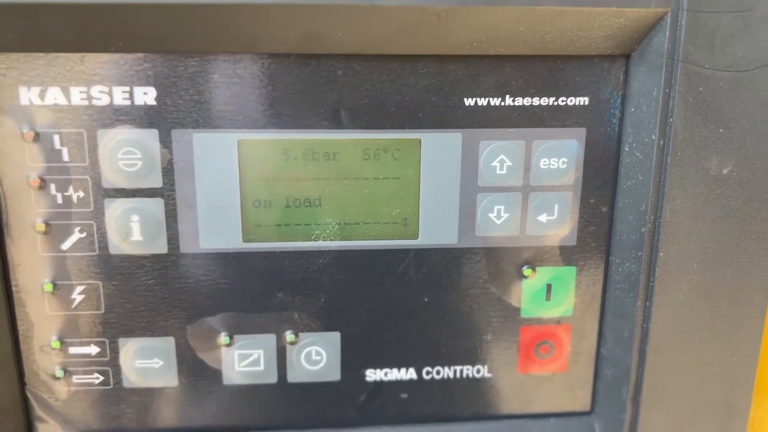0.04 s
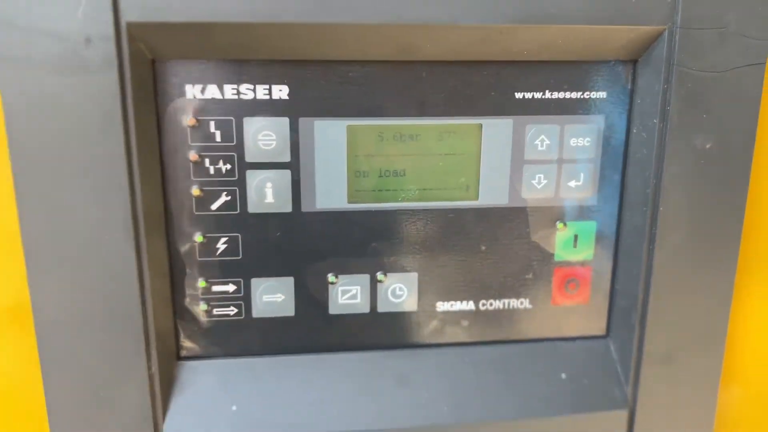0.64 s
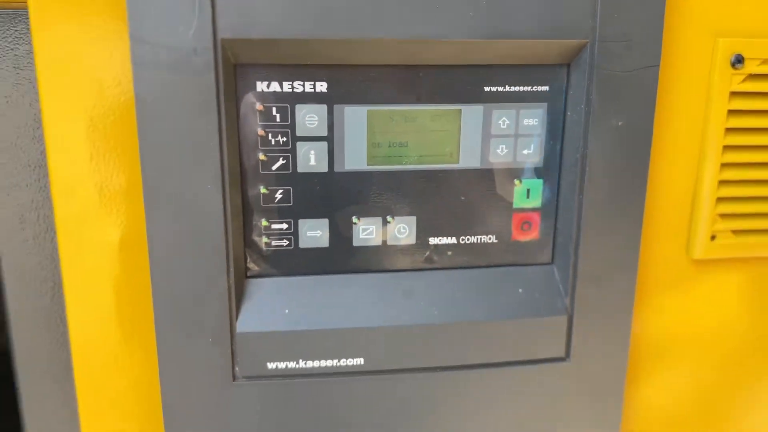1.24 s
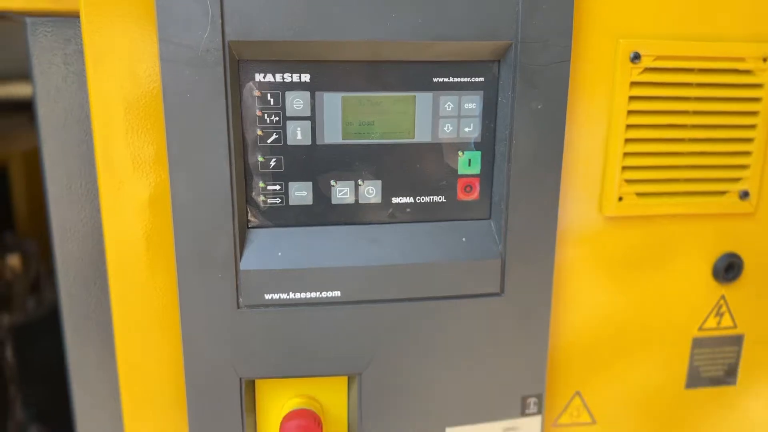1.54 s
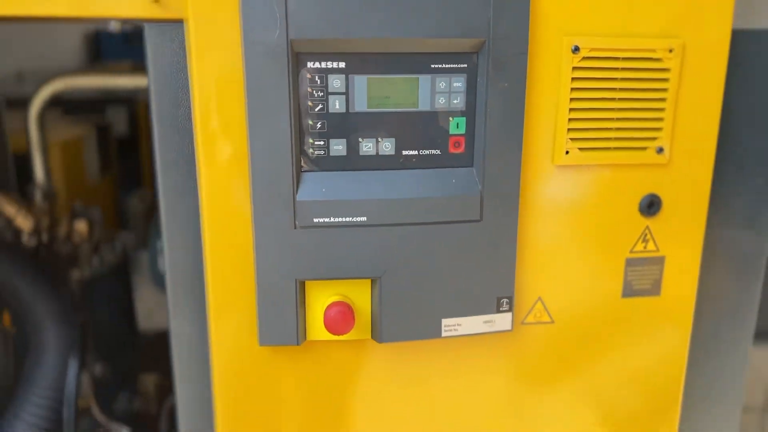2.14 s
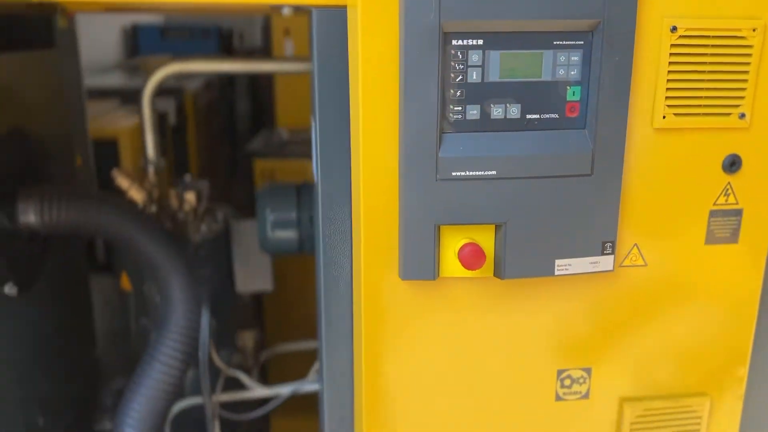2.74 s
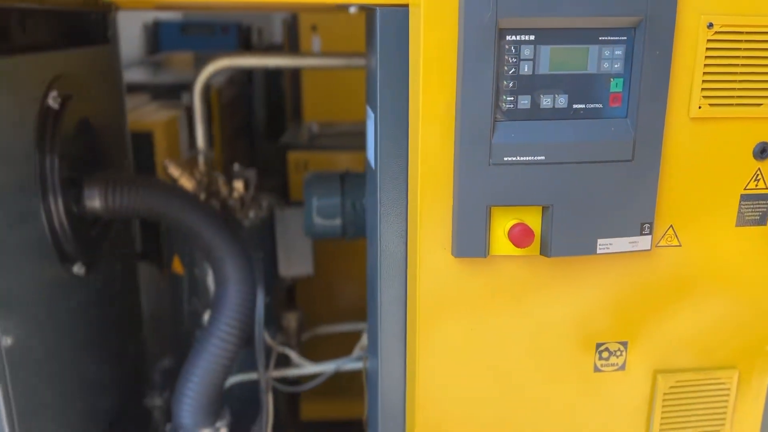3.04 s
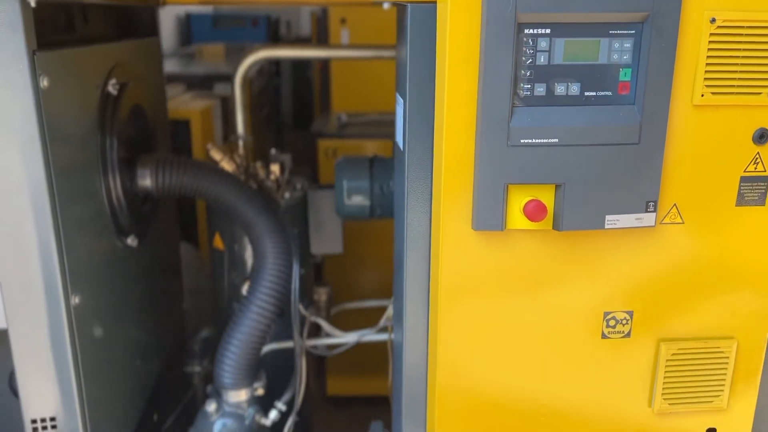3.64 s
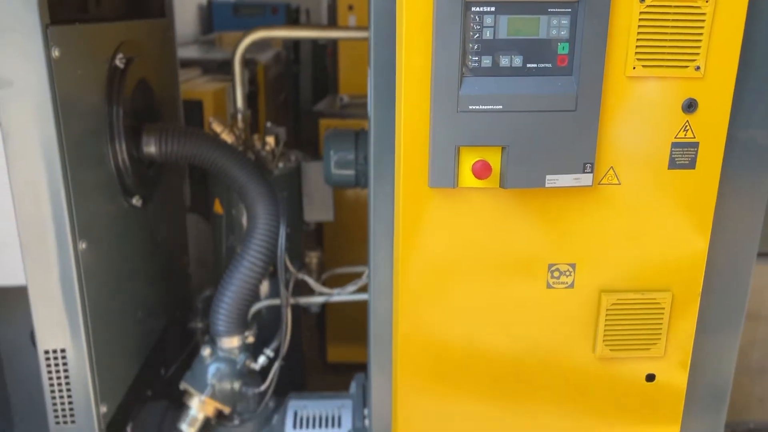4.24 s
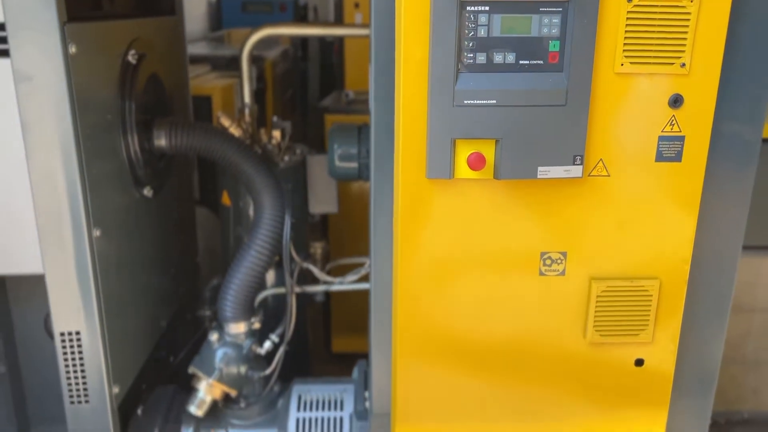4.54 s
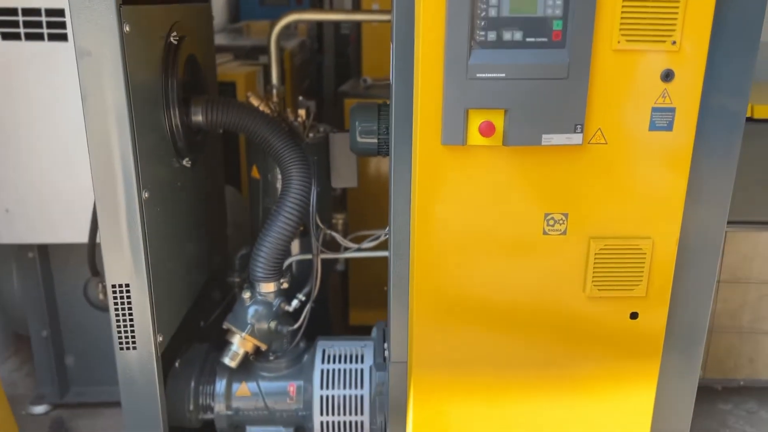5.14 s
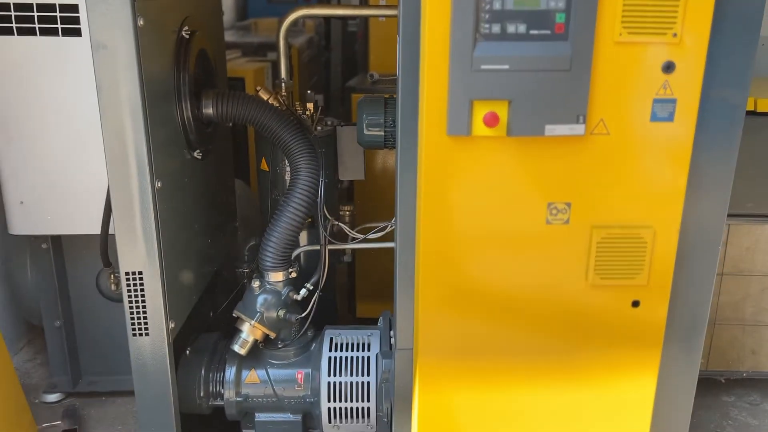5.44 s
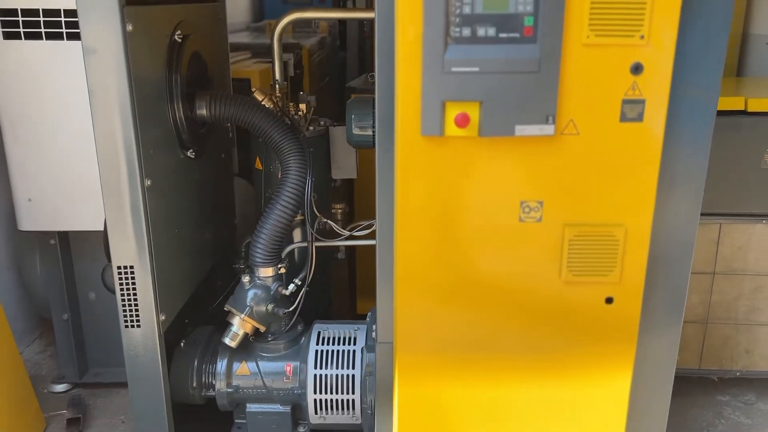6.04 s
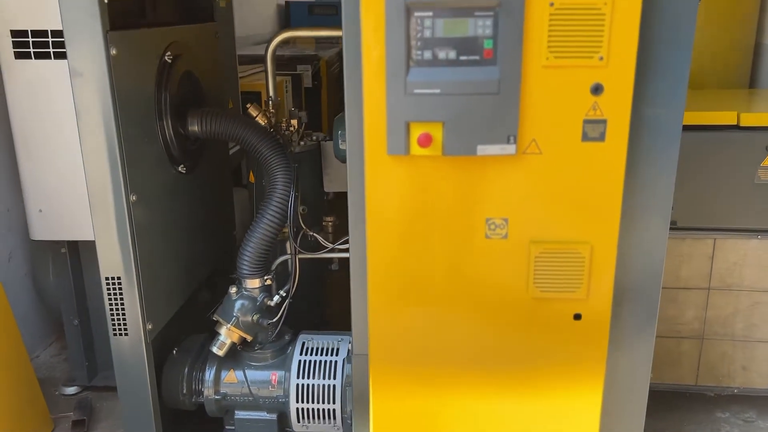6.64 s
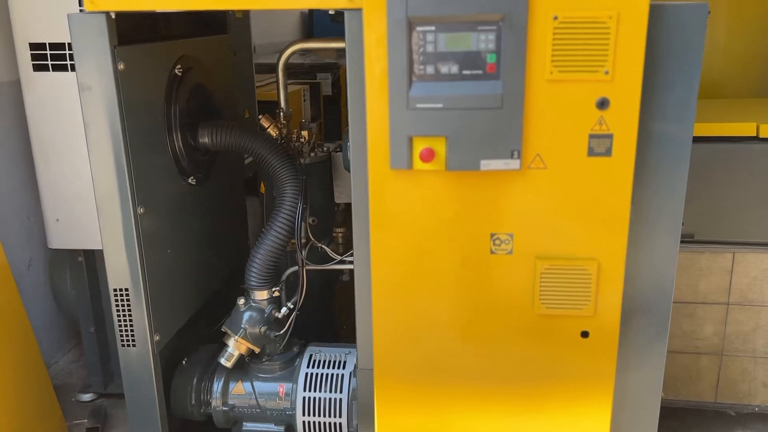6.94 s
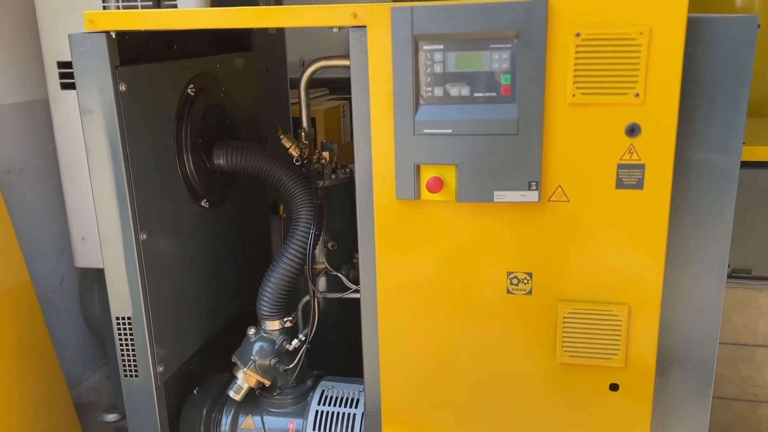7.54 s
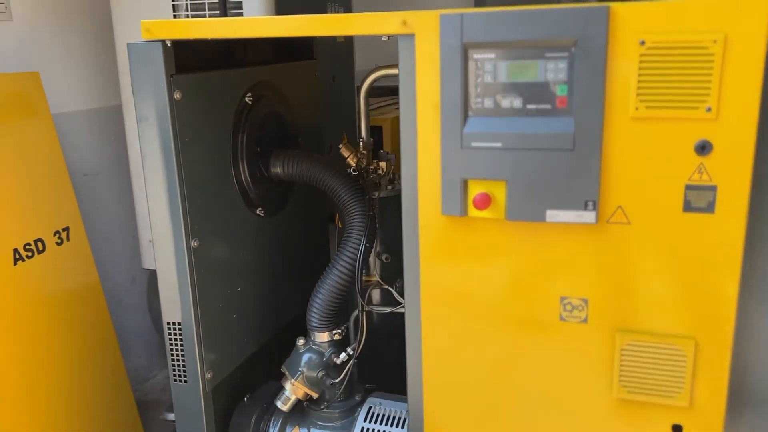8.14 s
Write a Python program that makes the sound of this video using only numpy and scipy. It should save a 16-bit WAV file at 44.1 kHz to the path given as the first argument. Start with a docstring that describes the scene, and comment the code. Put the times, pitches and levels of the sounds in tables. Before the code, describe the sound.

An air compressor runs in a workshop, with a loud, bright, steady hiss of air rushing through its pipes. Beneath it sit a quieter wavering hum and the low roar of a cooling fan. The hiss eases slightly as the microphone backs away. In the second half the cooling draught hits the microphone in soft thumps and short puffs, and the hiss grows a little as it comes closer again.

```python
"""Screw air compressor on load

In a workshop, air rushing through the pipework hisses; the rotors hum and the cooling fan roars low
in a cabinet with its side panel off. The microphone backs away, then comes closer again. Later it
stands in the cooling draught, whose eddies press on its two ports in soft thumps and short puffs."""
import sys
import numpy as np
from scipy import signal
from scipy.fft import rfft, irfft
from scipy.io import wavfile

SR = 44100
rng = np.random.default_rng(int(sys.argv[2]) if len(sys.argv) > 2 else 0)


def generate_wav(sig):
    """Save sig (samples, or channels by samples) to the path in sys.argv[1] as 16-bit PCM at SR."""
    pcm = np.round(np.clip(np.atleast_2d(sig).T, -1, 1) * 32767).astype(np.int16)
    wavfile.write(sys.argv[1], SR, pcm)


N = 369999
HOP = 256  # samples between spectral frames
TIME = np.arange(N) / SR
FRAME_S = (np.arange(N // HOP + 5) * HOP / SR)[:, None]
BIN_HZ = np.fft.rfftfreq(8 * HOP, 1 / SR)

# path of the microphone: t/s, distance from the machine/m
MIC_PATH = [(0, 0.51), (1.1, 0.39), (2, 0.67), (5.1, 1.5), (6.7, 1.56), (8.39, .72)]
# level difference between the microphone's ports: f/Hz, left minus right/dB
PORT_BALANCE = [(300, .5), (1200, 0), (2000, -1.2), (2800, .8), (4500, 5), (5500, 8.7), (6300, 4.8),
                (7200, 1.2), (8200, 1.3), (9000, 0)]
# left/right likeness of the hiss and roar: f/Hz, likeness (0-1)
STEREO_LIKENESS = [(100, .92), (250, .95), (450, .8), (650, .45), (1200, .35), (3300, .25), (5700, .15),
                   (6900, .48), (7700, .62), (8900, .78), (9600, .999), (10850, .999), (11600, .7),
                   (12600, .99), (14100, .99), (15200, .6)]
# left/right phase; a band near 10 kHz sounds wide, in opposite phase: f/Hz, lead of the left/rad
STEREO_PHASE = [(200, .2), (700, .5), (1500, 0), (7600, 0), (8450, -1.6), (9550, -3.12), (10800, -3.16),
                (11200, -4.1), (12200, -5.1), (12600, -6.2), (14300, -6.4), (15800, -9.1)]
# rotor hum along the path: t/s, level/dB of harmonics 1, 2 and 3
HUM_LEVELS = [(0, -51.5, -56.5, -75), (0.6, -75, -55, -78), (1.3, -76, -60.5, -73), (1.8, -66, -60, -64),
              (2.2, -58.5, -60, -60.5), (2.7, -54.5, -62, -63), (3.9, -53.5, -67.5, -64),
              (4.55, -53.5, -61.5, -63.5), (5.0, -57, -74, -60), (5.25, -54.5, -76, -68),
              (5.8, -59, -73, -68), (6.6, -60, -73, -59.5), (7.3, -61, -68, -58.5), (8.39, -76, -66, -59)]
# spectrum of the cooling fan: f/Hz, relative level/dB
FAN_SPECTRUM = [(20, -30), (40, -33), (65, -28), (100, -6.5), (125, -12), (175, -5.5), (210, 2.5),
                (280, -2), (330, 0.5), (420, -5.5), (600, -15), (1000, -30), (2000, -50)]
# cooling draught at the microphone: t/s, strength/dB
DRAUGHT_LEVELS = [(0, -26), (2.4, -18), (3.3, -12), (4.5, 1), (4.95, -6), (5.27, 3.5), (5.46, -8), (6.6, 1),
                  (7.2, 3), (7.7, -1), (8.39, -5)]
# spectrum of one thump: f/Hz, relative level/dB
THUMP_SPECTRUM = [(20, -12), (60, 3.5), (130, -4), (240, 2), (330, -3), (500, -6.5), (900, -13),
                  (2000, -58)]
# large eddies striking the microphone: t/s, strength/dB, extra bass/dB, extra edge/dB
LARGE_EDDIES = [(5.446, -12, 9, -2), (5.599, 1.5, 4, 0), (5.618, -7, -1, 0), (5.668, -2, -5, -2),
                (5.736, -2, 3, -1), (5.78, -2, -16, -6), (5.918, -1, -12, -6), (6.107, 0, -24, -11),
                (6.128, -7, -1, -2), (6.206, -2, 0, 3), (6.297, -1, -7, 0), (6.415, 0, -22, -8),
                (6.554, -2, -24, -7), (6.627, 1.5, -28, -12), (6.831, -4, -26, -12), (6.9, -4, -19, -2),
                (6.95, -1, -14, 0), (7.047, -1, -22, -2), (7.079, -5, -16, -1), (7.131, -6, -19, -4),
                (7.153, -2, -22, -1), (7.221, 0.5, -22, -11), (7.24, 0, -18, -2), (7.415, 4, -17, -14),
                (7.552, 2, -26, -8), (7.653, 3, -23, -8), (7.685, -7, -26, 1), (7.712, -2, -20, -1),
                (7.882, 0, -17, -6), (8.063, 1, -18, -8), (8.105, -3, -22, -5), (8.15, -1, -22, -6),
                (8.183, -3, -19, -1), (8.381, 0, -20, -4)]
# spectrum of the rushing air: f/Hz, relative level/dB
HISS_SPECTRUM = [(150, -33.5), (620, -22.5), (800, -17), (1300, -16), (1800, -12.5), (2800, -7.5),
                 (4000, -3.5), (4700, -3), (5700, 0.3), (7400, -5), (8400, -1.1), (10300, -10.5),
                 (11600, -0.5), (12800, -3.5), (15600, -5.5)]
# resonances of the steel cabinet: f/Hz, width/Hz, lift/dB
CABINET_MODES = [(750, 77, 1.5), (1110, 210, 2), (1760, 74, 1.5), (2260, 210, 1.5), (2820, 230, 2),
                 (6050, 110, 0.5), (6530, 200, 1)]
# peaks and dips from the front panel's reflection, close up: f/Hz, width/Hz, left/dB, right/dB
PANEL_REFLECTION = [(945, 310, -4.5, -8.5), (1650, 400, 1.5, 0.5), (2400, 96, 3.5, 0),
                    (4850, 140, 1.5, 1.5), (5770, 300, 0, 2), (8100, 330, -6.5, -4.3)]


def amp(db):
    """Amplitude ratio of a level in decibels."""
    return 10 ** (np.asarray(db) / 20)


def unit_rms(x):
    """Normalisation to rms 1."""
    return x / np.sqrt(np.mean(x ** 2) + 1e-20)


def bell(x, centre, width):
    """Gaussian curve of height 1."""
    return np.exp(-((x - centre) / width) ** 2)


def at_hz(rows, hz=BIN_HZ):
    """Interpolation of a table on a logarithmic frequency axis."""
    points_hz, value = np.transpose(rows)
    return np.interp(np.log(hz + 1), np.log(points_hz), value)


def drift(rate_hz):
    """Low-pass Gaussian noise of rms 1, one value a sample."""
    hz = np.fft.rfftfreq(N, 1 / SR)
    return unit_rms(irfft(rfft(rng.standard_normal(N)) * bell(hz, 0, rate_hz), N))


def patches(lasting_s, width_hz):
    """Random field of rms 1, correlated over neighbouring frames and bins."""
    shape = len(FRAME_S), len(BIN_HZ)
    along = np.fft.fftfreq(shape[0], HOP / SR)[:, None]
    across = np.fft.rfftfreq(shape[1], BIN_HZ[1])
    blur = np.exp(-(along * lasting_s) ** 2 - (across * width_hz) ** 2)
    return unit_rms(np.fft.irfft2(np.fft.rfft2(rng.standard_normal(shape)) * blur, shape))


def distance(s):
    """Metres from source to microphone at time s."""
    return np.interp(s, *np.transpose(MIC_PATH))


def draught_strength():
    """Amplitude envelope of the airflow at the microphone."""
    return amp(np.interp(TIME, *np.transpose(DRAUGHT_LEVELS)))


def stereo_noise(field_db, scatter_rad=0):
    """Partial correlation: coloured noise of rms 1, partly alike left and right; scatter blurs it."""
    a, b, c, d = rng.standard_normal(size=(4, len(FRAME_S), len(BIN_HZ)))
    left, independent = a + 1j * b, c + 1j * d
    likeness = at_hz(STEREO_LIKENESS)
    lead = at_hz(STEREO_PHASE) + scatter_rad * (1 - likeness) ** 2 * patches(2.62, 410)
    right = (likeness * left + np.sqrt(1 - likeness ** 2) * independent) * np.exp(-1j * lead)
    balance = amp(at_hz(PORT_BALANCE))
    spectra = np.array([left * balance, right]) / np.sqrt(1 + balance ** 2) * amp(field_db)
    sound = signal.istft(spectra.transpose(0, 2, 1), nperseg=8 * HOP, noverlap=7 * HOP)[1]
    return unit_rms(sound[:, :N])


def rotor_hum(lobe_hz=245.8, wander=0.00044, throb=0.37, draught_throb=0.48, port_lag_s=0.000087):
    """Periodic flow: each lobe releases a pocket of air; the harmonics swell in standing waves."""
    cycles = np.cumsum(lobe_hz * (1 + wander * drift(1.3))) / SR
    cycles = np.array([cycles, cycles - lobe_hz * port_lag_s])
    times, *harmonics_db = np.transpose(HUM_LEVELS)
    depth = throb + draught_throb * draught_strength()
    hum = np.zeros((2, N))
    for k, level_db in enumerate(harmonics_db, 1):
        waver = 1 + depth / k ** 1.1 * (drift(18) + 1j * drift(23))  # the lowest wavers most
        envelope = amp(np.interp(TIME, times, level_db)) * waver
        hum += np.sqrt(2) * (envelope * np.exp(2j * np.pi * (k * cycles + rng.random()))).real
    return hum


def fan_roar(level_db=-51, gust_db=1.0, shadow_db=-5, opening_at_s=2.1, opening_takes_s=1.3):
    """Diffraction: the front panel screens the midrange of the resonant fan noise; bass bends round."""
    progress = np.clip((FRAME_S - opening_at_s) / opening_takes_s, -.5, .5)
    screened = .5 - .5 * np.sin(np.pi * progress)  # 0 once the microphone faces the open side
    field_db = at_hz(FAN_SPECTRUM) + shadow_db * screened * bell(BIN_HZ, 305, 85)
    return stereo_noise(field_db + gust_db * patches(0.085, 260)) * amp(level_db)


def band(x, low_hz, high_hz):
    """Causal Butterworth band-pass."""
    return signal.sosfilt(signal.butter(2, [low_hz, high_hz], "band", fs=SR, output="sos"), x)


def draught(eddies_per_s=55, spread_db=1.5, flutter_db=-57.5, rumble_db=-67, rumble_apart=0.4):
    """Turbulent pressure: small eddies patter on the ports over a rumble partly each port's own."""
    sizes = rng.choice([-1, 1], N) * amp(-spread_db * rng.standard_normal(N))
    arrivals = rng.random(N) < eddies_per_s / SR
    flutter = unit_rms(band(arrivals * sizes, 154, 250))
    pressure = rng.standard_normal(N) + rumble_apart * rng.standard_normal((2, N))
    rumble = unit_rms(band(pressure, 80, 130))
    return (amp(flutter_db) * flutter + amp(rumble_db) * rumble) * draught_strength()


def thumps(level_db=-34.3, bass_lag_s=0.02604, bass_below_hz=135, edge_above_hz=400):
    """Group delay: a large eddy thumps on the ports; the bass of each thump arrives late, so the pitch falls."""
    hz = np.fft.rfftfreq(SR, 1 / SR)
    lag_cycles = np.cumsum(bass_lag_s * np.exp(-hz / bass_below_hz)) * hz[1]
    spectrum = amp(at_hz(THUMP_SPECTRUM, hz)) * np.exp(-2j * np.pi * lag_cycles)
    bass = bell(hz, 0, bass_below_hz)
    edge = hz ** 4 / (hz ** 4 + edge_above_hz ** 4)
    pressure = np.zeros(N + SR)
    for s, db, bass_db, edge_db in LARGE_EDDIES:
        push = irfft(spectrum * amp(db + bass_db * bass + edge_db * edge), SR)
        start = round(s * SR) - SR // 2
        pressure[start:start + SR] += np.roll(push, SR // 2)
    return amp(level_db) * pressure[:N] / abs(irfft(spectrum, SR)).max()


def air_hiss(at_1m_db=-20, per_doubling_db=-1.15, surge_db=0.05, ripple_db=0.5, flicker_db=2.5,
             eddy_db=1.0, whistle_db=10.5, panel_reach_m=0.23):
    """Resonance: jet noise excites the cabinet's modes; close up, the panel's reflection colours it."""
    field_db = at_hz(HISS_SPECTRUM) + sum(db * bell(BIN_HZ, hz, width) for hz, width, db in CABINET_MODES)
    field_db = field_db + ripple_db * patches(0.8, 250)  # near panels: broad, slow ripples
    field_db += flicker_db * patches(0.13, 36)  # fine, quick random flicker in the colour
    field_db += eddy_db * patches(0.018, 750)
    field_db += whistle_db * bell(FRAME_S, 2.11, 0.06) * bell(BIN_HZ, 8120, 160)  # one brief whistle
    metres = distance(FRAME_S)
    nearness = np.exp(-(metres - metres.min()) / panel_reach_m)
    for hz, width, left_db, right_db in PANEL_REFLECTION:
        field_db = field_db + np.multiply.outer([left_db, right_db], nearness * bell(BIN_HZ, hz, width))
    level_db = at_1m_db + per_doubling_db * np.log2(distance(TIME))  # the room keeps the fall slow
    return stereo_noise(field_db, scatter_rad=4.17) * amp(level_db + surge_db * drift(26))


def scene():
    """Superposition: a wide hiss over a nearly mono low end."""
    return air_hiss() + fan_roar() + rotor_hum() + draught() + thumps()


def record(dry, low_cut_hz=50, notch_hz=5480, notch_width_hz=60, band_limit_hz=15750):
    """Linear filtering: the microphone's low cut and narrow notch, then the band limit."""
    thinned = signal.lfilter(*signal.butter(2, low_cut_hz, "high", fs=SR), dry)
    notched = signal.lfilter(*signal.iirnotch(notch_hz, notch_hz / notch_width_hz, SR), thinned)
    low_pass = signal.firwin(1023, band_limit_hz, window=("kaiser", 9), fs=SR)
    return signal.oaconvolve(notched, low_pass[None], "same")


dry = scene()
out = record(dry)
generate_wav(out)
```